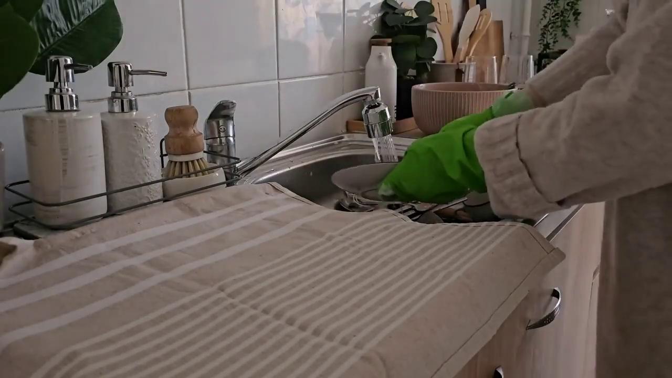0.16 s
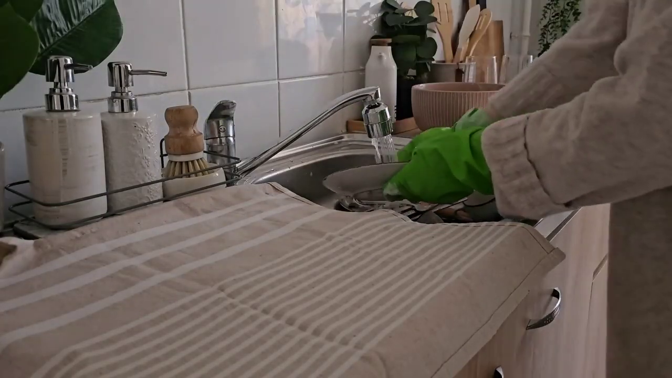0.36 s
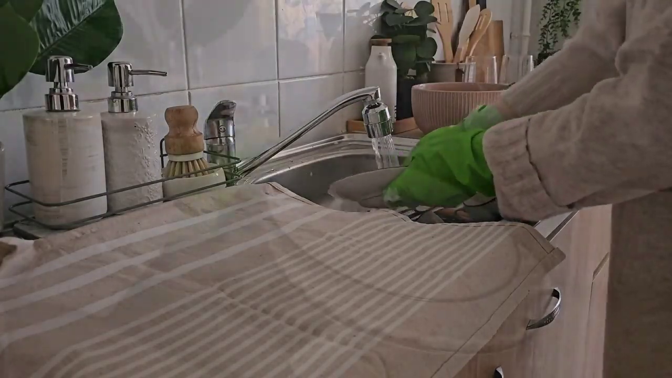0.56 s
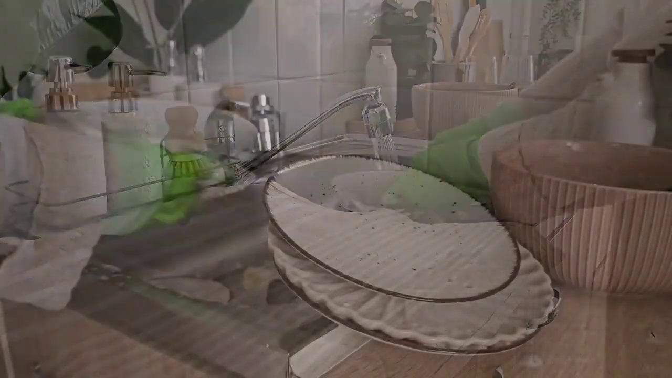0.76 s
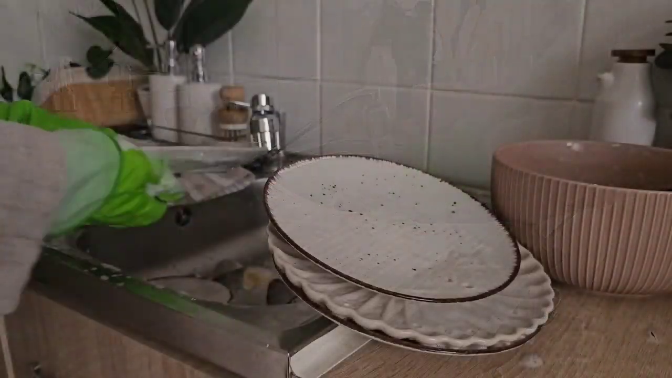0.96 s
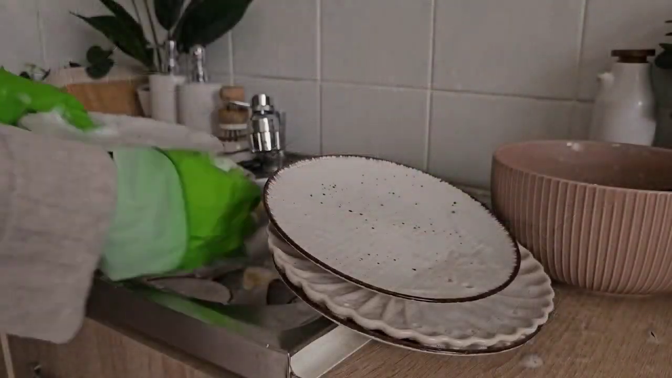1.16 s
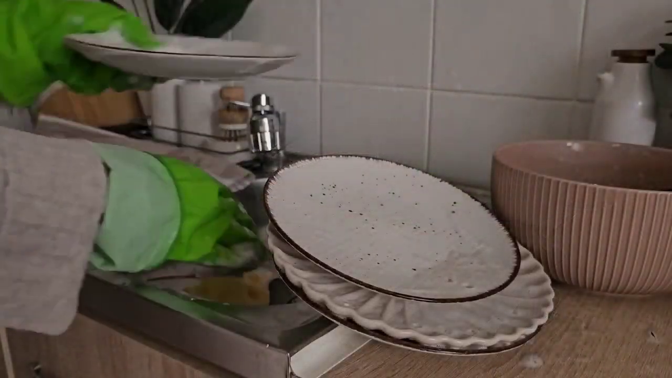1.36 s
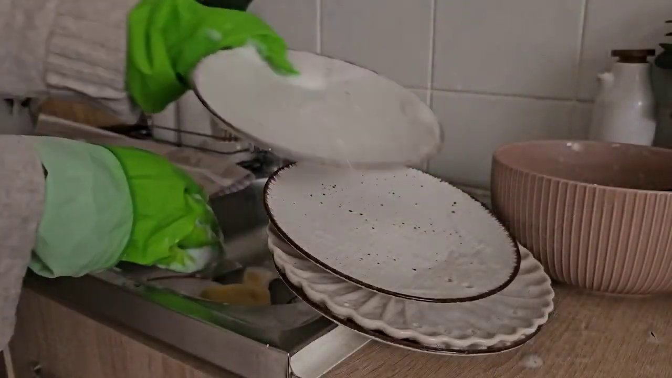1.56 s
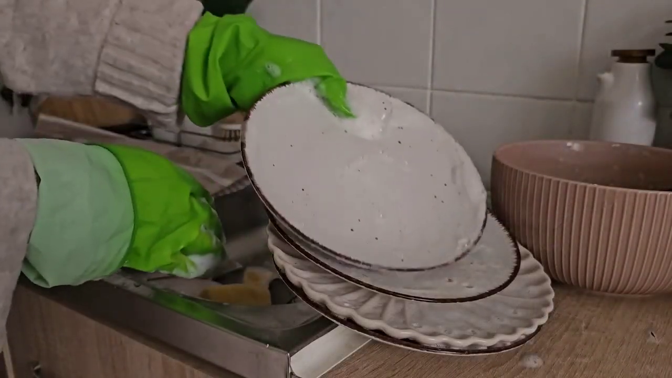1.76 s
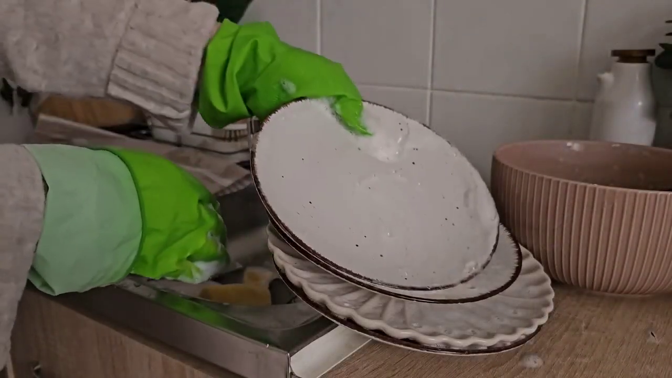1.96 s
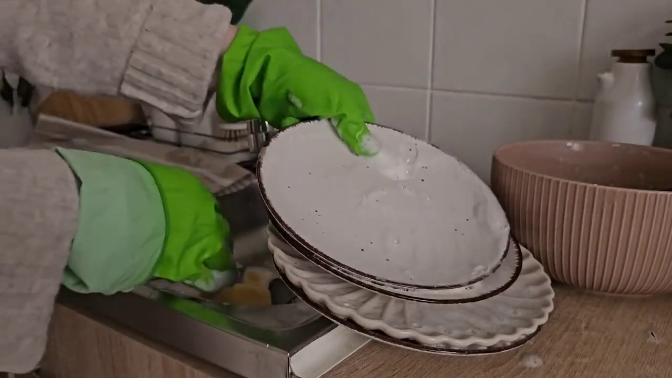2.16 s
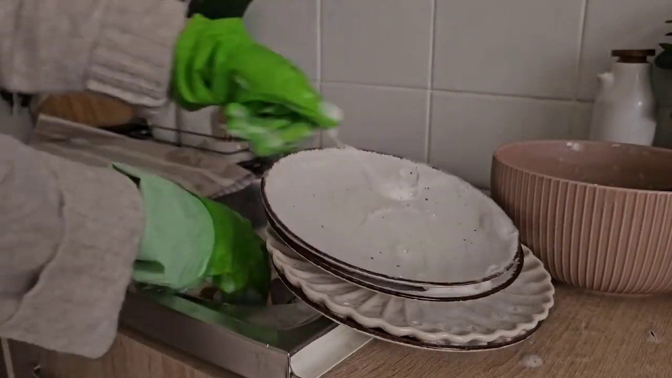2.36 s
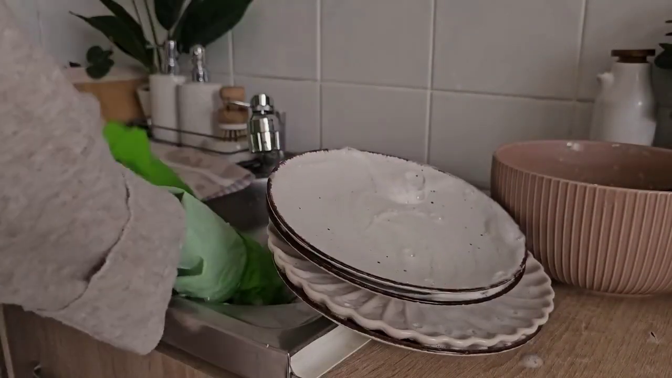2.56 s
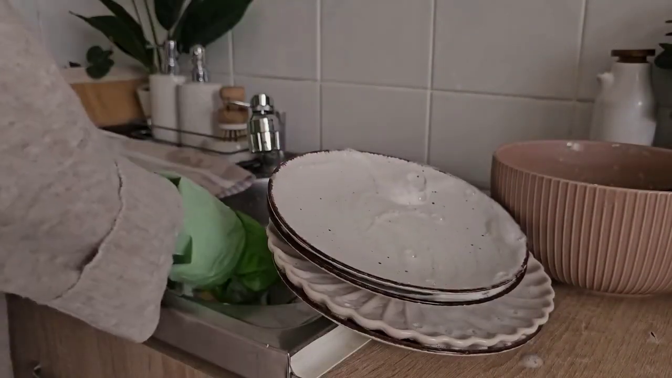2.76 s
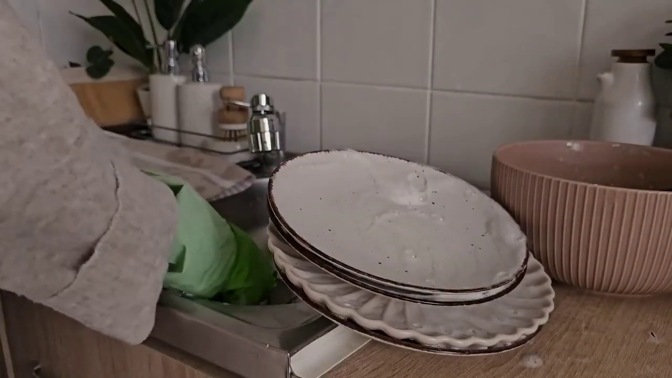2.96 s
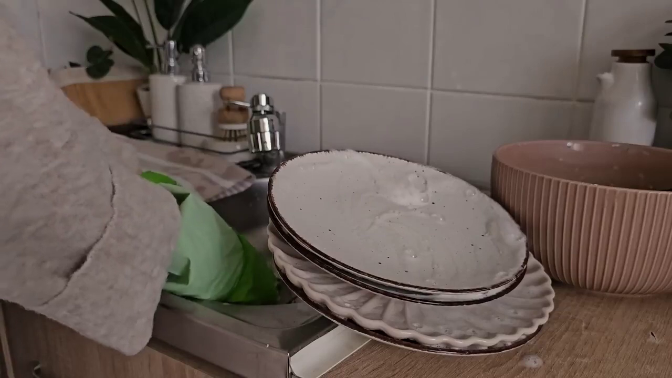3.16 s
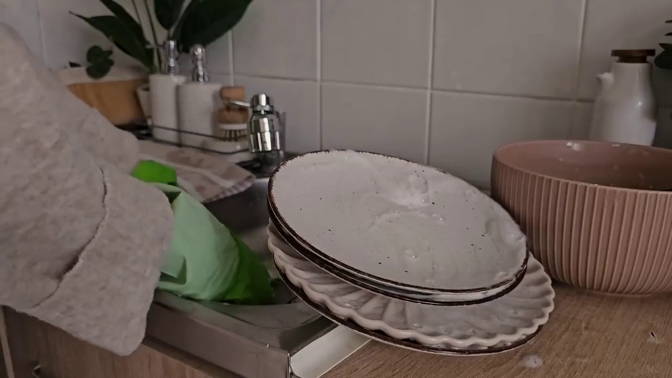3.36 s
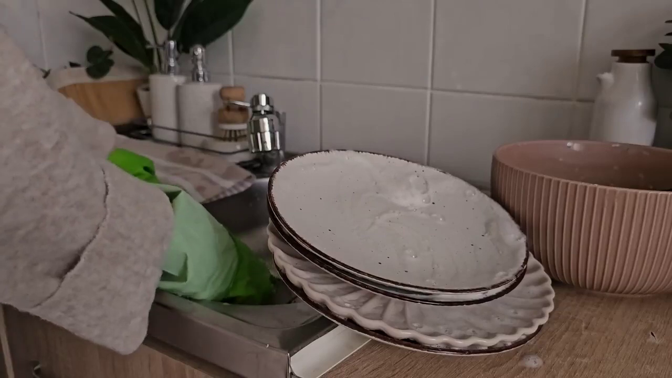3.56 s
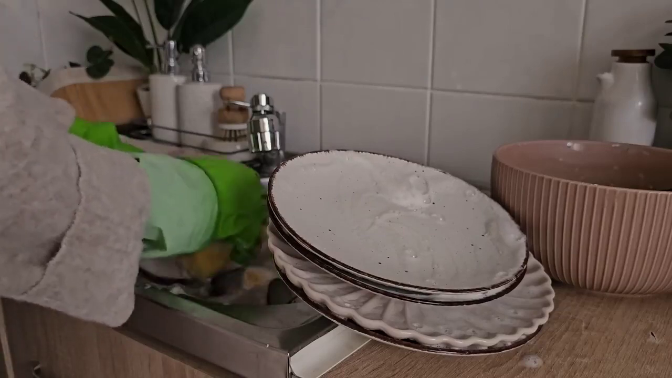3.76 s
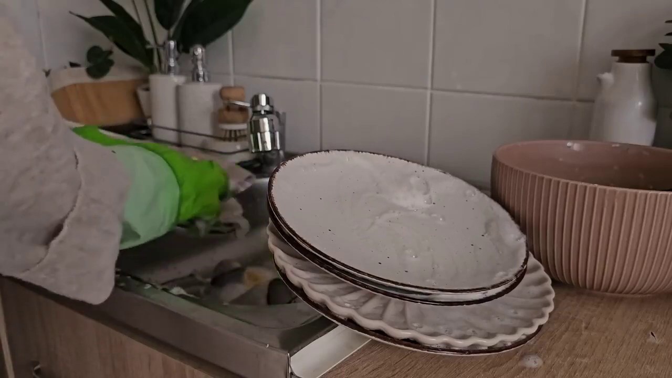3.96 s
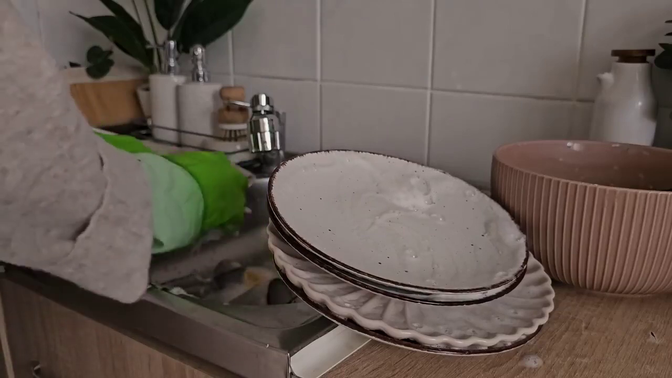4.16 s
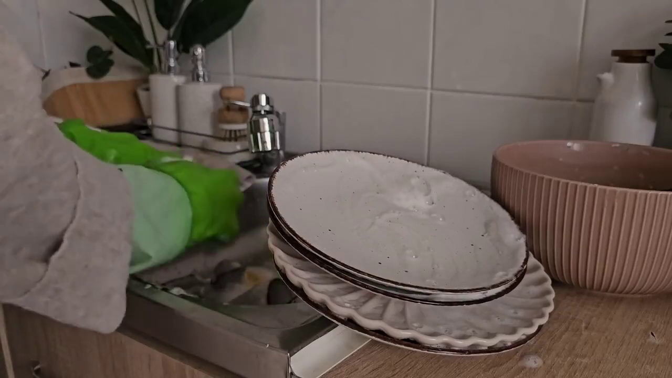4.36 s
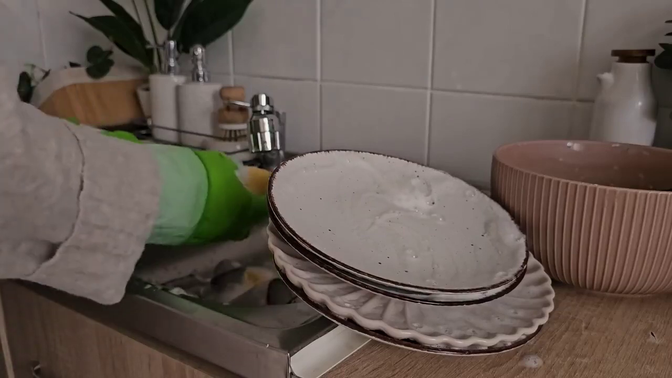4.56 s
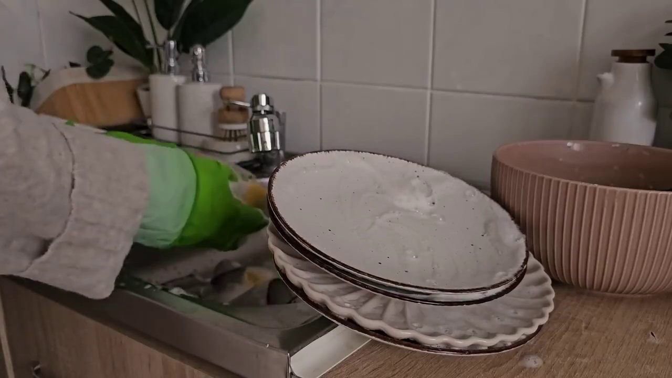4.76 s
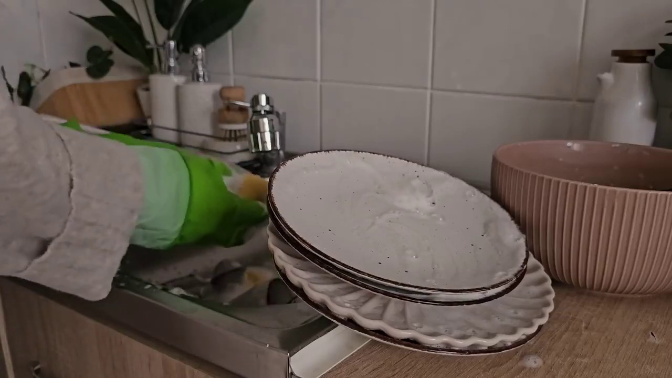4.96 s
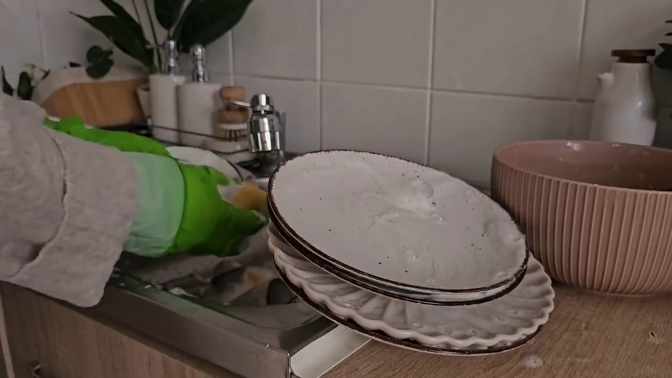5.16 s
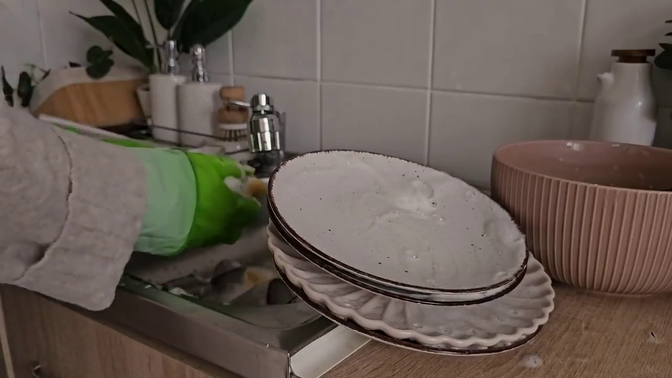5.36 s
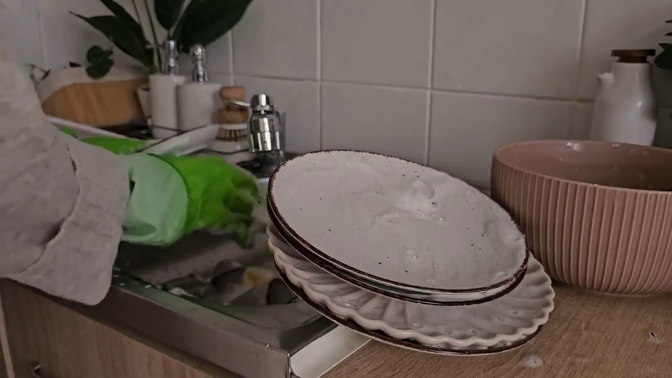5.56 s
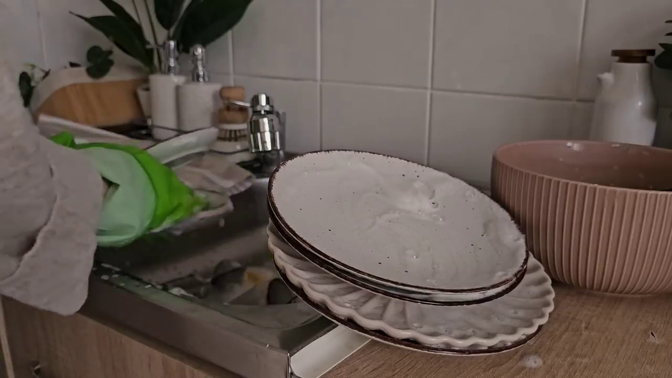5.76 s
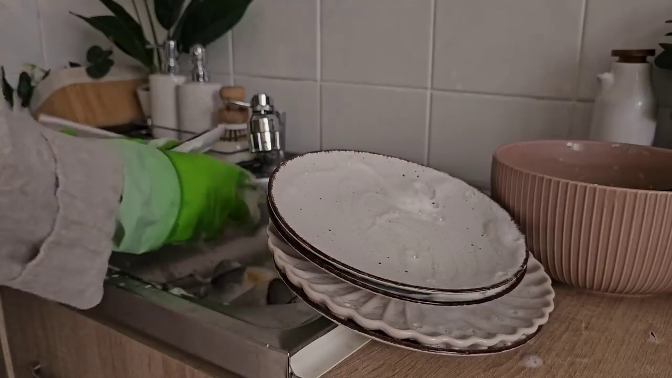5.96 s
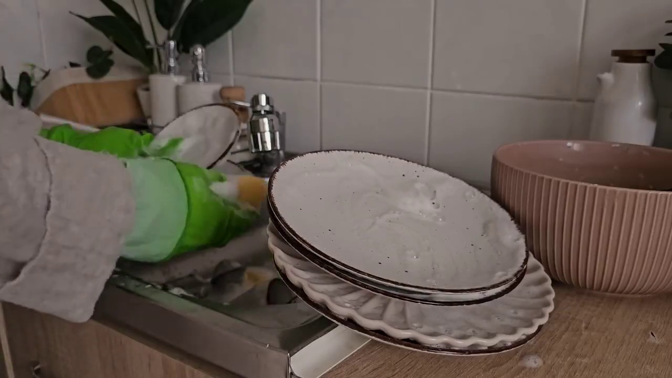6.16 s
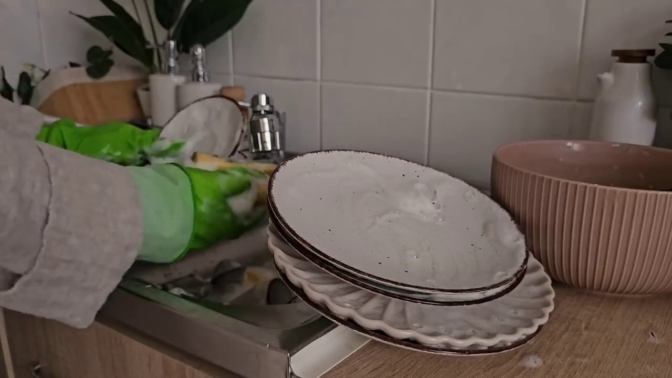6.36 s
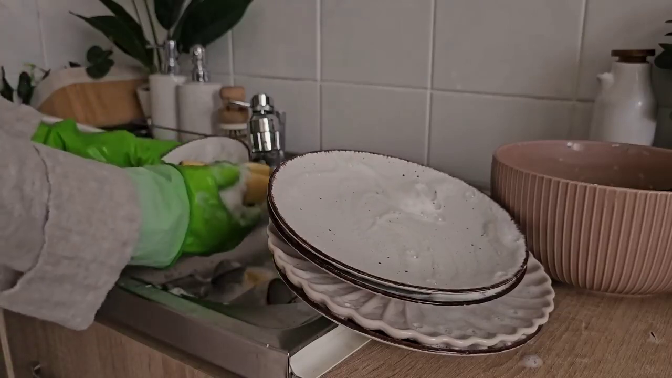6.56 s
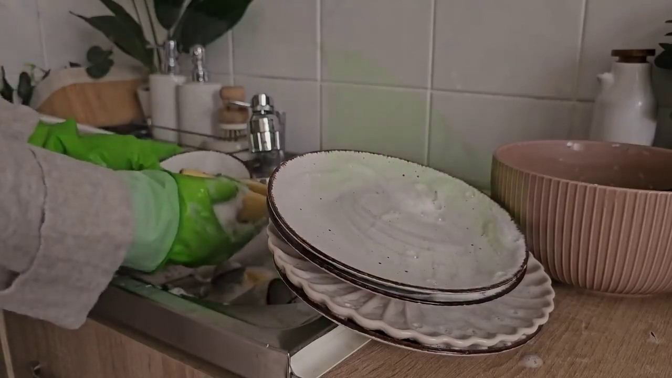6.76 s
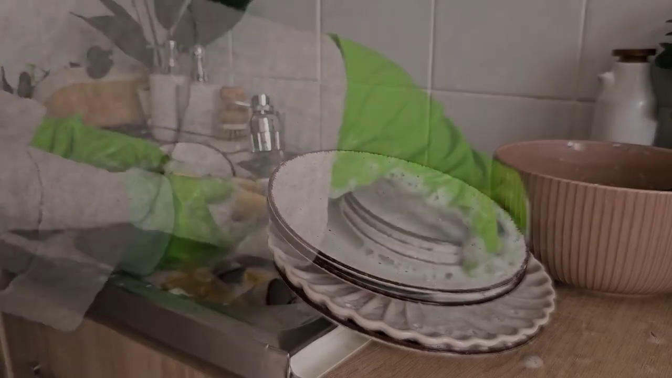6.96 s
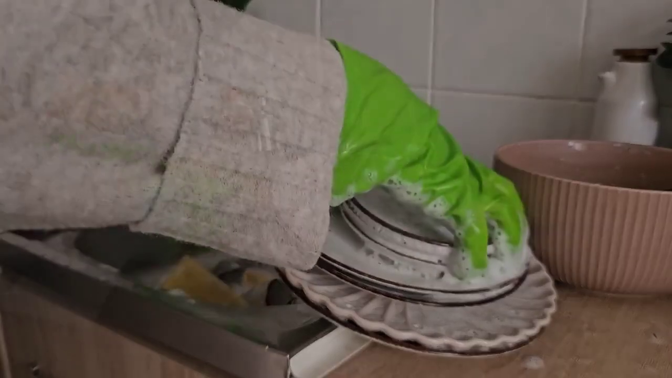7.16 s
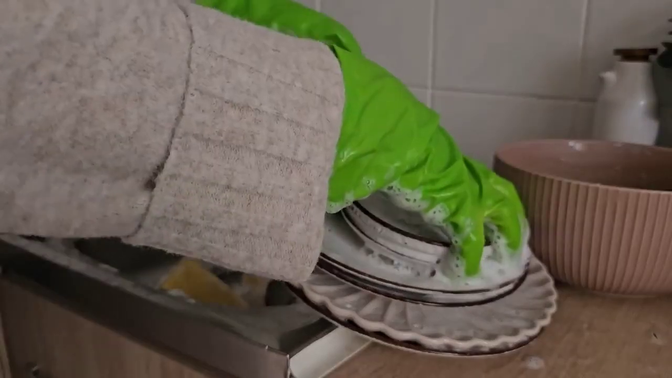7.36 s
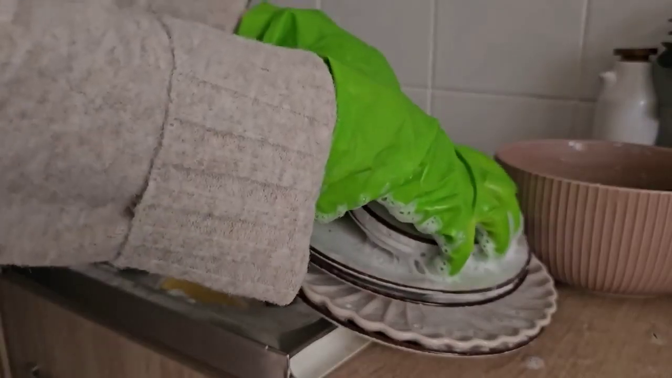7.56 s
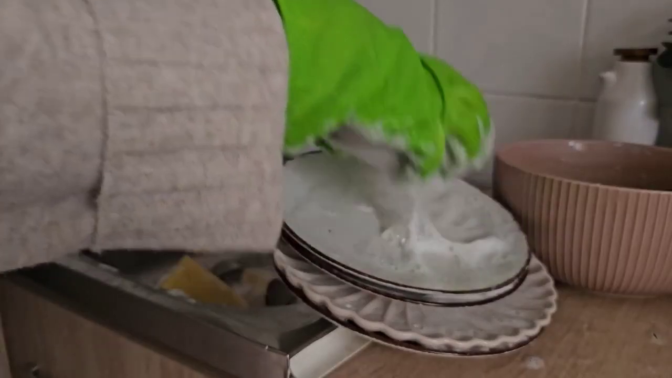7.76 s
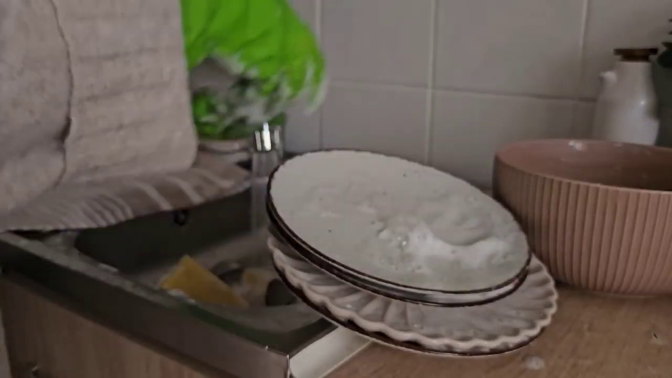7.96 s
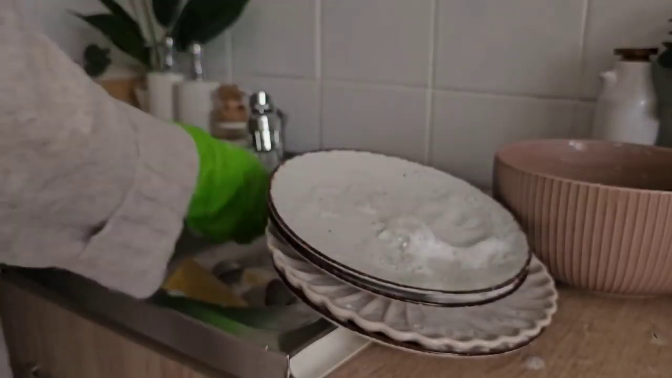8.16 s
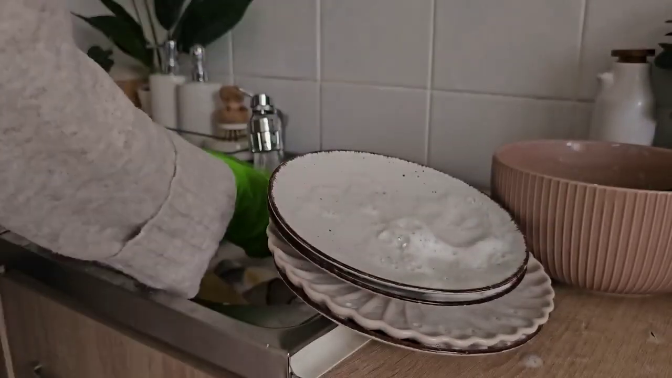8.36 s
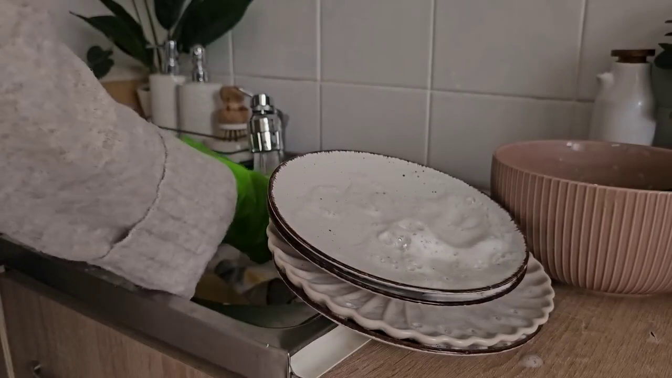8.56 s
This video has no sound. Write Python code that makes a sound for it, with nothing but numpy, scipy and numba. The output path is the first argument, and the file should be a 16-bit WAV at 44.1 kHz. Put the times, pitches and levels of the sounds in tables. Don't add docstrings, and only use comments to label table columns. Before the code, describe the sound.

A close stereo pickup, about a metre from a steel kitchen sink, with short tiled-room echo and a very faint low hum. From 0 s water trickles softly with drips, wet rubs and fizz; a dish lightly touches steel at 0.7 s, and small low bumps follow at 1.3 s as the water thins. At 1.9 s a plate lands with a sharp clack and hollow boom. More knocks come at 2.0 s, the loudest at 2.4 s, bright and clattering, with smaller ones until 2.7 s. Around 3.1 s water gushes briefly while a plate rattles; at 3.8 s two rims clink clearly. From 4.5 to 6 s it is quieter: plops, drips, faint bumps and sponge rubs. At 6.3 s a saucer rings high and bright, then settles. Dull cup knocks run from 6.7 to 7.6 s. Spray rises from about 7 s, strongest near 8 s, with drips and crackling suds to the end at 8.6 s.

```python
import sys
import numpy as np
from scipy import signal
from scipy.fft import rfft, irfft
from scipy.io import wavfile
from scipy.ndimage import uniform_filter1d, minimum_filter1d
from numba import njit

SR = 44100
rng = np.random.default_rng(int(sys.argv[2]) if len(sys.argv) > 2 else 0)


def persist_wave(psi):
    counts = np.round(np.clip(psi, -1, 1) * 32767).astype(np.int16)
    wavfile.write(sys.argv[1], SR, np.atleast_2d(counts).T)


def elevation(decibels):
    levels = np.asarray(decibels, float)
    return 10 ** (levels / 20)


N = 379260

# (f/Hz, side minus mid level/dB)
STEREO_WIDTH = [(60, -16), (110, -15.5), (200, -11), (380, -7), (700, -3), (1290, 0.5), (2380, 0.5),
                (4400, 0), (8120, 1.5), (15000, 0.5)]
# (f/Hz, level/dB)
CHINA_CRACK = [(180, -32.5), (300, -14.5), (1040, -6), (1970, -4), (2140, -5), (3640, -7.5), (4020, -8.5),
               (6960, -15.5), (8640, -15.5), (16000, -39)]
# (f/Hz, level/dB per Hz)
SPRAY_COLOUR = [(2060, -24), (3500, -2), (5640, -9.5), (7320, -4), (9380, -4), (10700, -10.5),
                (15100, -5.5), (16000, -26)]
QUIET_WATER_DB = -55


def across(table, hz):
    points = np.array(table)
    return np.interp(np.log(np.maximum(hz, 1)), np.log(points[:, 0]), points[:, 1])


def along(table):
    s, *columns = np.transpose(table)
    return [np.interp(np.arange(N) / SR, s, column) for column in columns]


def add(out, s, sound):
    i = int(s * SR)
    out[:, i:i + sound.shape[1]] += sound[:, :N - i]


def walk(rate):
    hold = int(SR / rate)
    levels = np.repeat(rng.standard_normal(N // hold + 1), hold)
    return 0.8 * uniform_filter1d(uniform_filter1d(levels, hold), hold)[:N]


def noise(colour, size, tilt_db=0., bands=(), valley_db=0.):
    hz = np.arange(size // 2 + 1) * SR / size
    if len(bands):
        valley_db = valley_db - 5.5 * np.log2(np.maximum(hz / 4000, 1))
    lift = elevation(valley_db) + sum(elevation(db) / (1 + ((hz - f) / (.013 * f + 20)) ** 2) for f, db in bands)
    shape = lift * elevation(across(colour, hz) + tilt_db * np.log2(hz / 2000 + 0.16))
    mid, side = rfft(rng.standard_normal((2, size))) * shape
    side = side * elevation(across(STEREO_WIDTH, hz))
    x = irfft(np.array([mid + side, mid - side]), size)
    return x / np.sqrt(np.mean(x ** 2))


def house_hum(stir_db):
    # (f/Hz, level/dB per Hz)
    colour = [(12, -59), (20, -20.5), (29, -11.5), (43, -10), (55, 5), (75, -2), (162, -16.5), (200, -8.5),
              (260, -25.5), (440, -120)]
    hum_db = -60 + 0.4 * (stir_db - QUIET_WATER_DB)
    return noise(colour, N) * elevation(hum_db + 1.5 * walk(0.83))


def stream_rumble(stir_db, spray_db, drum_db):
    # (f/Hz, level/dB per Hz)
    colour = [(53, -38), (90, -12), (247, 4), (350, -8.5), (378, 0.5), (560, -5), (900, -27), (1170, -46.5),
              (1980, -120)]
    rumble_db = -57 + drum_db + 0.79 * (stir_db - QUIET_WATER_DB) + 0.22 * (spray_db - QUIET_WATER_DB)
    return noise(colour, N) * elevation(rumble_db + 3.5 * walk(8.3))


def bubble(hz, cycles, glide, pan):
    turns = np.arange(int(SR * 3 * cycles / hz)) * hz / SR
    tone = np.sin(2 * np.pi * turns * (1 + glide * turns / cycles))
    tone = tone * np.exp(-2.3 * turns / cycles) * np.minimum(turns, 1)
    return tone * np.array([[1 + pan], [1 - pan]])


def waves():
    # (t/s, peak level/dB, swell/s)
    swells = [
        (2.45, -49, 0.057),
        (3.97, -52, 0.053),
        (4.45, -57, 0.28),
        (6.461, -45, 0.067),
    ]
    t, out = np.arange(N) / SR, np.zeros(N)
    for s, peak_db, swell_s in swells:
        turns = np.maximum(t - s + swell_s, 0) / swell_s
        out += elevation(peak_db) * (turns * np.exp(1 - turns)) ** 2
    return out


def slosh(stir_db, surge):
    # (f/Hz, level/dB per Hz)
    colour = [(290, -33), (500, -7), (597, -6), (804, -12.5), (1180, -3), (1280, -5), (2270, -9),
              (7000, -20.5), (9100, -54.5), (15400, -120)]
    gurgle = np.zeros((2, N))
    for when, pitch, size, pan in rng.uniform(0, 1, (1400, 4)):
        level = elevation(-2.5 * np.log(size + 0.035)) / (1 + 1.5 * pitch)
        add(gurgle, when * N / SR, level * bubble(600 * 2 ** (3.0 * pitch), 11.0, 0.14, pan - .5))
    gurgle = gurgle / np.sqrt(np.mean(gurgle ** 2))
    basin = noise(colour, N) + elevation(-9.5) * gurgle
    return basin * (elevation(stir_db) + waves()) * elevation(-1.5 + 0.73 * surge + 3.6 * walk(35))


def spray(spray_db, surge):
    hiss, patter = noise(SPRAY_COLOUR, N), np.zeros((2, N))
    edges = np.geomspace(1500, 17000, num=8)
    for k, band in enumerate(zip(edges, edges[1:])):
        part = signal.sosfilt(signal.butter(2, band, "band", fs=SR, output="sos"), (-1) ** k * hiss)
        patter += part * elevation(2.4 * walk(45))
    patter = patter * elevation(spray_db + 0.4 * surge + 1.6 * walk(70))
    ticks = rng.standard_normal((2, N)) * (rng.uniform(0, 1, N) < 250 / SR)
    ticks = signal.sosfilt(signal.butter(1, (4500, 11000), "band", fs=SR, output="sos"), ticks)
    return patter + ticks / ticks.std() * elevation(spray_db - 8)


def water():
    # (t/s, stirring level/dB, fine spray level/dB, drumming against the stirring/dB)
    flow = [(0.0, -51, -62.5, 4), (.96, -54.5, -65.5, 0.5), (1.08, -59, -70, -2.5), (1.77, -70, -88.5, 1.5),
            (2.73, -60.5, -76, 2), (3.09, -44.5, -52.5, 12), (3.28, -58, -72.5, 12),
            (3.71, -64.5, -79.5, 16), (4.21, -57.5, -68.5, 2.7), (4.72, -67, -77.5, 7.5),
            (5.03, -73, -95, 9.5), (5.42, -62.5, -80, -6), (5.75, -56, -73.5, 1.5),
            (6.27, -58.5, -76.5, -6), (6.75, -57, -63.5, 1.5), (7.8, -52, -54, 1.8), (8.3, -52, -57, 3.5),
            (8.6, -54.5, -67, 5.5)]
    stir_db, spray_db, drum_db = along(flow)
    surge = walk(6)
    wet = slosh(stir_db, surge) + spray(spray_db, surge)
    return wet + stream_rumble(stir_db, spray_db, drum_db) + house_hum(stir_db)


def drips():
    # (t/s, peak level/dB, f/Hz)
    drops = [(0.094, -37.5, 2310), (0.269, -48, 596), (1.69, -55, 1040), (4.556, -36.5, 1207),
             (4.627, -46, 1310), (4.749, -34, 1890), (4.905, -44.5, 1143), (5.072, -46, 1200),
             (5.495, -44.5, 1500), (5.906, -45, 1420), (7.3, -39.5, 974), (7.368, -38, 2400),
             (7.83, -33, 1350), (7.928, -41, 2700), (8.117, -39, 2260), (8.22, -37, 1300)]
    out = np.zeros((2, N))
    for s, peak_db, hz in drops:
        for late, detune, pan in rng.uniform(-0.67, 1, (9, 3)):
            level = elevation(peak_db - 8.0 - 1.2 * abs(late) - 6.5 * abs(detune))
            drop = bubble(hz * 2 ** (.5 * detune ** 3), 12, 0.051, 2.3 * pan)
            add(out, s + 0.0046 * late ** 2, level * drop)
    return out


def suds(size=8192):
    # (t/s, peak level/dB, f/Hz, spread/octaves)
    squeezes = [(0.3044, -43, 7090, 0.37), (0.5107, -56, 4130, 0.25), (0.7177, -36, 4000, 0.42),
                (3.2877, -44, 9380, 0.36), (4.7504, -49, 4460, 0.56), (5.1297, -53.5, 4140, 0.22),
                (5.2373, -59.5, 8400, 0.3), (5.6204, -48, 4050, 0.5), (5.6927, -44.5, 4960, 0.54),
                (6.9204, -63, 5420, 0.3), (7.0464, -56, 5370, 0.3), (7.1254, -47, 4490, 0.33),
                (7.161, -40, 5360, 0.56), (7.2144, -52, 5240, 0.35), (7.3983, -41.5, 7600, 0.3),
                (7.538, -40, 6050, 0.56), (7.701, -47, 9600, 0.28), (7.7194, -58, 7190, 0.3),
                (7.8343, -41, 8870, 0.3), (7.965, -38.5, 9230, 0.2), (8.0122, -42, 8500, 0.3),
                (8.0744, -44, 4690, 0.16), (8.129, -39.5, 8300, 0.3), (8.2295, -37.5, 7400, 0.36),
                (8.3194, -54, 9490, 0.3)]
    out, t, hz = np.zeros((2, N)), np.arange(size) / SR, np.arange(size // 2 + 1) * SR / size
    rise_s, fade_s = 0.00074, 0.028
    for s, peak_db, mid_hz, octaves in squeezes:
        uneven = elevation(21.0 * uniform_filter1d(rng.standard_normal(size), size=36))
        pops = rng.standard_normal((2, size)) * uneven
        pops = pops + 0.34 * pops[::-1]
        band = np.exp(-.5 * (np.log2(hz / mid_hz + 1e-9) / octaves) ** 2)
        fizz = irfft(rfft(pops) * band, size)
        shape = (1 - np.exp(-t / rise_s)) * np.exp(-t / fade_s)
        add(out, s, elevation(peak_db - 10.5) * fizz / fizz.std() * shape)
    return out


def rubs(size=16384):
    # (t/s, peak level/dB, tilt/dB per octave)
    strokes = [(0.139, -45, -0.5), (0.281, -45.5, -2), (0.349, -44.5, -3.5), (0.6, -48, -2),
               (1.02, -48.5, -5.5), (1.389, -48, 2.5), (2.699, -55.5, 5), (2.962, -57.5, 5),
               (3.29, -64, 5.5), (4.059, -50, -5.5), (7.44, -49, -0.5), (4.789, -59, -1.5),
               (5.561, -56, -3), (5.692, -49.5, -2), (2.299, -49.5, -4.5), (2.397, -31.5, -1),
               (5.756, -47.5, -5), (6.58, -41, -8.5)]
    out, t, swell_s = np.zeros((2, N)), np.arange(size) / SR, 0.023
    turns = t / swell_s
    for s, peak_db, tilt_db in strokes:
        grain = elevation(10 * uniform_filter1d(rng.standard_normal(size), size=100))
        foam = elevation(4.88 * tilt_db - 14.5) * noise(SPRAY_COLOUR, size)
        hiss = noise(CHINA_CRACK, size, tilt_db) + foam
        add(out, s - swell_s, elevation(peak_db) * hiss * grain * (turns * np.exp(1 - turns)) ** 2)
    return out


def pings(size=16384):
    # (t/s, peak level/dB, f/Hz, rise/s, time to fall 60 dB/s)
    touches = [(.255, -41.5, 610, 0.0037, 0.073), (.287, -42, 584, .005, 0.086),
               (.595, -48, 694, .006, 0.11), (.7148, -33, 500, 0.00061, 0.077),
               (2.0235, -19, 732, 0.00058, 0.043), (2.025, -36, 2560, .004, 0.25),
               (2.026, -36, 4200, .003, .12), (2.063, -23.5, 1330, 0.0029, 0.072),
               (2.347, -35, 3360, 0.019, 0.18), (2.374, -28, 6080, 0.0023, 0.24),
               (2.376, -31.5, 8630, 0.0069, 0.2), (2.983, -34.5, 4265, 0.0034, 0.093),
               (3.196, -46.5, 3943, .003, 0.14), (3.498, -29, 326, .0007, 0.051),
               (3.768, -44, 15700, 0.0025, 0.16), (2.991, -25, 2243, 0.0033, 0.11),
               (5.13, -40, 884, 0.0019, 0.036), (5.163, -49, 864, .008, 0.085),
               (5.188, -45, 1000, .003, .04), (5.243, -46.5, 1199, 0.0032, 0.038),
               (6.688, -24, 1006, 0.00072, 0.012), (7.467, -34, 1110, 0.00065, 0.026),
               (7.468, -35, 560, 0.0018, 0.033), (7.562, -31, 594, .0006, 0.04),
               (7.831, -34.5, 1400, 0.00064, 0.031), (1.866, -25, 517.3, 0.0024, 0.19)]
    out, t = np.zeros((2, N)), np.arange(size) / SR
    for s, peak_db, hz, rise_s, t60 in touches:
        split, turn, start = rng.uniform(-1, 1, 3)
        turn = turn * np.arctan(elevation(across(STEREO_WIDTH, hz))) * np.array([[1], [-1]])
        tone = np.sin(2 * np.pi * hz * t + turn)
        twin = .45 * np.sin(2 * np.pi * hz * (1 + .011 * split) * t + 3 * start - turn)
        shape = (1 - np.exp(-t / rise_s)) ** 2 * elevation(-60 * t / t60)
        add(out, s, elevation(peak_db) * (tone + twin) * shape / shape.max())
    return out


@njit
def ring(push, poles, gains):
    out = np.zeros((2, len(push)))
    for m in range(len(poles)):
        z = 0j
        for i in range(len(push)):
            z = z * poles[m] + push[i]
            out[0, i] += (z * gains[0, m]).imag
            out[1, i] += (z * gains[1, m]).imag
    return out


def knocks(hits, modes, colour, damping, focus_db, tail_s, rise_s, rattle, valley_db, size=16384):
    out, t = np.zeros((2, N)), np.arange(size) / SR
    hz, db, t60 = np.repeat(np.transpose(modes), 5, axis=1)
    partner = np.tile([0, 1, -1, 1, -1], len(modes))
    split = hz * (1 + 0.019 * partner * rng.uniform(0.12, 1, len(hz)))
    ring_s = np.clip(damping * t60 * (1 - 0.48 * partner ** 2), .02, .33)
    poles = np.exp(2j * np.pi * split / SR - np.log(1000) / (ring_s * SR))
    rise = 1 - np.exp(-t / rise_s)
    blow = np.arange(size) == int(rise_s * SR)
    for s, peak_db, focus_hz, tilt_db, chatter_s, crack_db in hits:
        spot, turn = rng.standard_normal((2, len(hz)))
        chatter = rise * np.exp(-t / chatter_s) * rng.standard_normal(size)
        chatter = chatter * elevation(7.6 * rng.standard_normal(size))
        push = rattle * chatter / np.linalg.norm(chatter) + blow + 1e-18
        favour_db = focus_db * np.exp(-(np.log(hz / focus_hz) / 0.056) ** 2)
        spot_db = 2.0 * spot - 5 * partner ** 2 + favour_db
        turn = turn * np.arctan(elevation(across(STEREO_WIDTH, hz)))
        gains = elevation(db + spot_db + tilt_db * np.log2(hz / 2000)) * np.exp(1j * np.array([turn, -turn]))
        tones = ring(push, poles, gains)
        bands = np.transpose([hz, spot_db])[partner == 0]
        crack = noise(colour, size, tilt_db, bands, valley_db) * np.exp(-t / (chatter_s + tail_s))
        crack = crack + 1.04 * noise(colour, size, tilt_db) * np.exp(-t / (0.38 * tail_s))
        crack = rise * crack
        both = tones / np.abs(tones).max() + elevation(crack_db) * crack / np.abs(crack).max()
        add(out, s, elevation(peak_db) * both)
    return out


def sharp(hits, chatter_s, crack_db, crack_per_db):
    return [(s, db, hz, tilt_db, chatter_s, crack_db - crack_per_db * (db + 26.0))
            for s, db, hz, tilt_db in hits]


def blunt(hits, tilt_db, chatter_s, shorter_per_db):
    return [(s, db, hz, tilt_db, chatter_s * elevation(-shorter_per_db * crack_db), crack_db)
            for s, db, hz, crack_db in hits]


def steel_sink():
    # (t/s, peak level/dB, favoured f/Hz, crack against the ring/dB)
    hits = [(0.714, -34, 364, 9), (1.332, -36, 197, -9), (1.347, -27.5, 303, 2), (1.373, -26.5, 197, -7.5),
            (1.866, -14, 510, -4), (2.022, -23.5, 560, 0.5), (2.064, -20, 197, -5.5),
            (2.374, -12.5, 526, 1.5), (2.409, -17, 70.7, 6.5), (2.611, -19, 166, -4.5),
            (2.649, -27, 205, 10), (2.912, -33, 398, -0.5), (3.085, -25, 233, -6.5), (3.104, -21, 296, 1),
            (3.17, -28, 67, -12), (3.5, -19, 298, -1), (3.77, -30.5, 214, -0.5), (4.257, -39, 127.5, -1.5),
            (4.331, -32, 440, -1), (5.63, -47.5, 535, -23), (5.725, -41, 255, -0.5), (5.77, -50, 255, -9),
            (5.815, -61, 255, -18.5), (7.1, -40, 383, 6), (7.118, -33, 197, 5.5), (7.14, -28, 123, -4.5),
            (7.468, -33, 440, 3), (7.564, -33.5, 197, 8), (7.609, -38, 117, -20)]
    # (f/Hz, level/dB, time to fall 60 dB/s)
    modes = [(69, -7, .28), (121, -12, 1), (117, -1, .8), (197, -4, 0.69), (233, 0, .8), (255, -11, 0.55),
             (294.8, 1, 0.09), (364.8, 1, 0.27), (440, -7.5, 0.098), (471, -2.5, 0.14), (535, -13.5, 0.13),
             (560, -7, 0.084), (697, -6, 0.062)]
    # (f/Hz, level/dB per Hz)
    boom = [(24, -44.5), (40, -23.5), (210, -13), (425, -14), (553, -9), (935, -13.5), (2180, -18.5),
            (2370, -22.5), (5000, -30.5), (6500, -59.5), (11000, -120)]
    return knocks(blunt(hits, -.8, 0.025, 0.63), modes, boom, damping=1.0, focus_db=15,
                  tail_s=0.046, rise_s=0.002, rattle=8.2, valley_db=-1.5)


def cup():
    # (t/s, peak level/dB, favoured f/Hz, crack against the ring/dB)
    hits = [(5.129, -43.5, 905, 6.5), (5.146, -46, 850, -7), (5.199, -45, 955, -2.5), (5.229, -47, 994, 2),
            (6.688, -23, 998, 11), (6.728, -22, 980, -10), (6.779, -35, 1040, -6), (6.916, -35.5, 950, 1),
            (6.977, -33.5, 950, -2.5), (7.043, -38, 935, 7), (7.164, -26, 964, 0), (7.224, -40.5, 1070, 9),
            (7.465, -29, 766, -1.5), (7.561, -27.5, 790, -1)]
    # (f/Hz, level/dB, time to fall 60 dB/s)
    modes = [(789, -11, 0.3), (850, -1, 0.42), (954, 2, 0.23), (1026, -17, 0.13), (1200, 12, 0.14),
             (2120, -17, 0.26), (2350, -3.5, 0.28), (2720, -24, 0.14), (2960, -16, 0.24), (4200, -9, .11),
             (5370, -8, .15), (8160, -21, .2), (12100, -5, .3)]
    return knocks(blunt(hits, -3.5, 0.016, 0.041), modes, CHINA_CRACK, damping=0.36, focus_db=12,
                  tail_s=0.0028, rise_s=0.00053, rattle=0.6, valley_db=-8.0)


def saucer():
    # (t/s, peak level/dB, favoured f/Hz, tilt/dB per octave)
    hits = [
        (6.288, -16.5, 4900, 4.5),
        (6.294, -16, 5400, 0.5),
        (6.309, -9.5, 2260, 3),
        (6.317, -22, 1870, 4.5),
        (6.345, -30, 1500, -3),
        (6.514, -42, 4450, -7),
        (6.436, -31.5, 650, -3.5),
        (6.447, -41, 5400, 0.5),
        (6.506, -29, 1250, -3),
        (6.561, -36, 1250, -2.5),
    ]
    # (f/Hz, level/dB, time to fall 60 dB/s)
    modes = [(675, -18, 0.14), (865, -1.5, 0.17), (1250, -38, 0.24), (1500, -1, 1), (1670, 0, 0.18),
             (1907, -22, 0.29), (2260, -16.5, 0.24), (2780, -15, 0.22), (3323, -19.5, 0.067),
             (4450, -12, 0.052), (5022, 7, 0.16), (5400, -2, .14), (6100, -11.5, 0.16), (8000, -10, 0.45),
             (8540, -1, 0.15), (9265, -21, 0.17), (7330, -29, .15), (11400, -13.5, 0.4),
             (11820, -14.5, 0.27), (12460, -14, 0.35), (15200, -15, 0.3)]
    return knocks(sharp(hits, 0.02, 4.85, 0.44), modes, CHINA_CRACK, damping=0.3, focus_db=14.0,
                  tail_s=0.007, rise_s=0.00058, rattle=1.0, valley_db=-4.5)


def rattling_plate():
    # (t/s, peak level/dB, favoured f/Hz, tilt/dB per octave)
    hits = [(1.301, -41.5, 2080, -1), (2.929, -36, 1200, 8), (2.983, -22.5, 4200, -8.5),
            (2.993, -29, 2240, 5), (3.105, -29.5, 1250, 1.5), (3.222, -46, 2050, -4),
            (3.194, -45, 3910, -5), (3.381, -43.5, 1200, -3.5), (3.439, -22, 3430, -3.5),
            (3.519, -30.5, 2260, 5), (3.976, -49.5, 3910, 6.5), (4.261, -49.5, 1250, 0),
            (4.326, -38, 1256, 7.5), (1.289, -50.5, 3914, -5)]
    # (f/Hz, level/dB, time to fall 60 dB/s)
    modes = [(1250, -17, 0.28), (1350, -4, 0.37), (2050, -3, 0.09), (2243, -2.5, 0.3), (2980, -3, 0.067),
             (3914, -10, 0.21), (4300, -6, 0.06), (4900, -17, 0.14), (6460, -29, .15), (7090, -38, 0.23),
             (9880, -23, .18), (11930, -23.5, .15)]
    return knocks(sharp(hits, 0.0041, -1.7, 0.42), modes, CHINA_CRACK, damping=0.76, focus_db=17,
                  tail_s=0.04, rise_s=0.0012, rattle=1.0, valley_db=-0.36)


def clink():
    # (t/s, peak level/dB, favoured f/Hz, tilt/dB per octave)
    hits = [
        (3.765, -12, 4920, 0.98),
        (3.783, -36.5, 4904, 0.62),
        (3.812, -29.5, 4904, -1.3),
    ]
    # (f/Hz, level/dB, time to fall 60 dB/s)
    modes = [(1630, -38, 0.34), (2245, 4, 0.42), (2150, -24, 0.25), (3320, 1.5, 0.12), (3660, -4.5, 0.062),
             (3950, 1.5, 0.44), (4904, -3, 0.26), (7840, -17, 0.13), (9430, -2, 0.2), (9862, -6.5, 0.43),
             (9240, -7, 0.3), (11400, -12, 0.24), (12250, -13.5, 0.18), (14200, -16.5, 0.22)]
    return knocks(sharp(hits, 0.0047, -2.0, 0.24), modes, CHINA_CRACK, damping=0.45, focus_db=6.7,
                  tail_s=0.028, rise_s=.003, rattle=1.6, valley_db=0)


def landing_plate():
    # (t/s, peak level/dB, favoured f/Hz, tilt/dB per octave)
    hits = [
        (.714, -33, 1350, 0.87),
        (1.686, -67, 3924, -2),
        (1.782, -53, 2530, -0.3),
        (1.863, -14.5, 3924, 0.14),
        (1.866, -15, 4813, -1.9),
        (1.879, -16.5, 1050, 1),
    ]
    # (f/Hz, level/dB, time to fall 60 dB/s)
    modes = [(1050, -0.5, 0.084), (1350, -8, 0.23), (2530, -2, .2), (3450, -12, 0.17), (3924, -10.5, 0.14),
             (4813, -12.5, 0.22), (6330, -11.5, .15), (7680, -2.5, .13), (8500, -19, .3), (9600, -13.5, .1),
             (10460, -15, .25), (11460, -10.5, 0.17), (12250, -21, .13), (13530, -14, 0.22),
             (13900, -18.5, .25), (14940, -17, .15)]
    return knocks(sharp(hits, 0.0072, 6.8, 0.061), modes, CHINA_CRACK, damping=0.59, focus_db=14.0,
                  tail_s=0.0047, rise_s=0.0008, rattle=3.1, valley_db=-11.0)


def drying_stack():
    # (t/s, peak level/dB, favoured f/Hz, tilt/dB per octave)
    hits = [(2.023, -16.5, 1040, -7), (2.06, -22.5, 4763, -3), (2.372, -6.5, 2158, -2),
            (2.385, -12, 3970, -1), (2.429, -19, 2142, -1), (2.645, -31, 4324, -5.5),
            (2.340, -39.5, 4324, -6), (2.362, -36, 1186, -4.5), (2.396, -17.5, 1186, -1),
            (2.467, -29, 2142, -8), (2.499, -28.5, 1186, -6), (2.667, -28, 2120, -7.5),
            (2.702, -42.5, 2142, -9.5), (2.633, -40, 4763, -1.5)]
    # (f/Hz, level/dB, time to fall 60 dB/s)
    modes = [(806, -13.5, 0.063), (1040, -1.5, 0.036), (1186, -10.5, 0.2), (1350, -8, 0.25),
             (2142, -9, 0.22), (2550, 1, 0.2), (3340, -5, 0.32), (3970, -1.5, 0.36), (4324, -17, 0.45),
             (4763, -19.5, 0.2), (5130, -19, .25), (6160, -3.5, 0.34), (5900, -14, .15), (6970, -19, 0.16),
             (7770, -12, 0.49), (8430, -13, 0.41), (9410, -15.5, .2), (10000, -21.5, .15),
             (10540, -24.5, .2), (11250, -12.5, 0.43), (11500, -23, .2), (13300, -15, .15),
             (14000, -14.5, .22), (13800, -18, .25), (14900, -24.5, .15)]
    return knocks(sharp(hits, 0.0058, 6.6, 0.021), modes, CHINA_CRACK, damping=0.79, focus_db=12.0,
                  tail_s=0.011, rise_s=0.0022, rattle=2.5, valley_db=-4.0)


@njit
def walls(x, lags, gain, damp):
    line, soft, out = np.zeros((8, 4096)), np.zeros(8), np.zeros(x.shape)
    for i in range(x.shape[1]):
        total = 0.
        for k in range(8):
            soft[k] += (1 - damp) * (gain[k] * line[k, (i - lags[k]) & 4095] - soft[k])
            total += soft[k]
            out[k % 2, i] += soft[k]
        for k in range(8):
            line[k, i & 4095] = x[k % 2, i] + soft[k] - total / 4
    return out


def kitchen_echo(x):
    lags = rng.integers(400, 2200, 8)
    t60 = 0.31
    return elevation(-11) * walls(x, lags, elevation(-60 * lags / SR / t60), 0.18)


def scene():
    china = drying_stack() + landing_plate() + clink() + rattling_plate() + saucer() + cup()
    china = china + drips() + suds()
    china = signal.sosfilt(signal.butter(4, 250, "high", fs=SR, output="sos"), china)
    china = china + pings()
    sink = steel_sink() + rubs()
    sink = signal.sosfilt(signal.butter(8, 59, "high", fs=SR, output="sos"), sink)
    return china + sink + kitchen_echo(china) + water()


def drop_weak_treble(x, under_db, from_hz, loud_db, size=1024, count=10):
    hz, _, z = signal.stft(x, SR, nperseg=size, noverlap=size * 3 // 4)
    power = (np.abs(z) ** 2).mean(axis=0)
    total = power[hz > 500].sum(axis=0)
    band = np.arange(len(hz)) // count
    share = np.add.reduceat(power, np.arange(0, len(hz), count))[band] / total
    spare_db = np.maximum(loud_db - 10 * np.log10(total + 1e-18), 0)
    strongest = -minimum_filter1d(-share, size=5 * count, axis=0)
    neighbour_db = 10 * np.log10(share / strongest + 1e-18) + 10.5
    margin_db = np.minimum(10 * np.log10(share + 1e-18) - under_db, neighbour_db) + spare_db
    keep = np.clip(margin_db / 3 + .5, 0, 1)
    z = z * np.where(hz[:, None] > from_hz, keep, 1)
    return signal.istft(z, SR, nperseg=size, noverlap=size * 3 // 4)[1][:, :N]


def low_pass(x):
    return signal.sosfilt(signal.butter(12, 16000, fs=SR, output="sos"), x)


def record(dry):
    mix = drop_weak_treble(np.clip(dry, -1, 1), under_db=-41.5, from_hz=5400, loud_db=-36)
    return low_pass(mix)


dry = scene()
out = record(dry)
persist_wave(out)
```